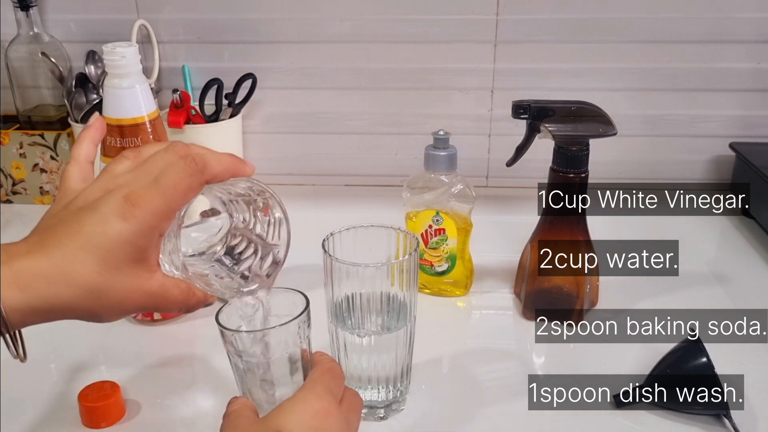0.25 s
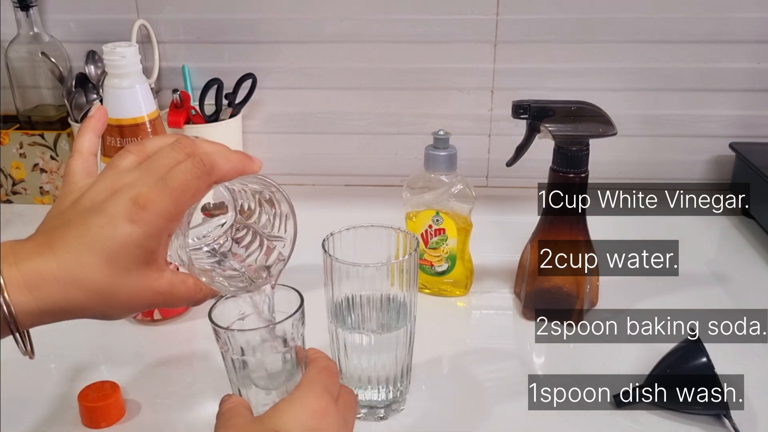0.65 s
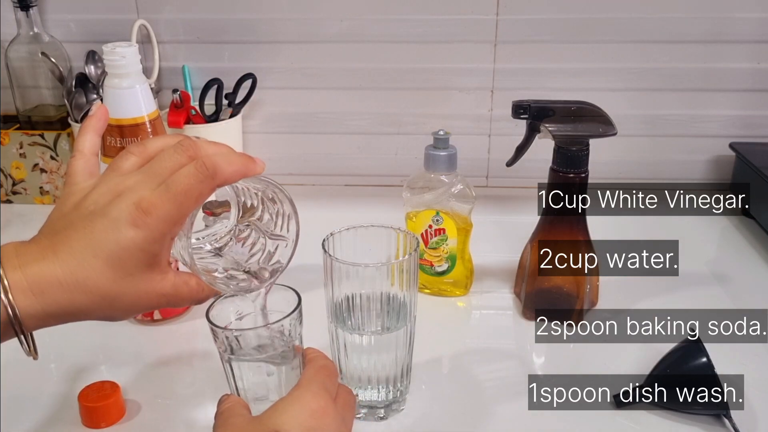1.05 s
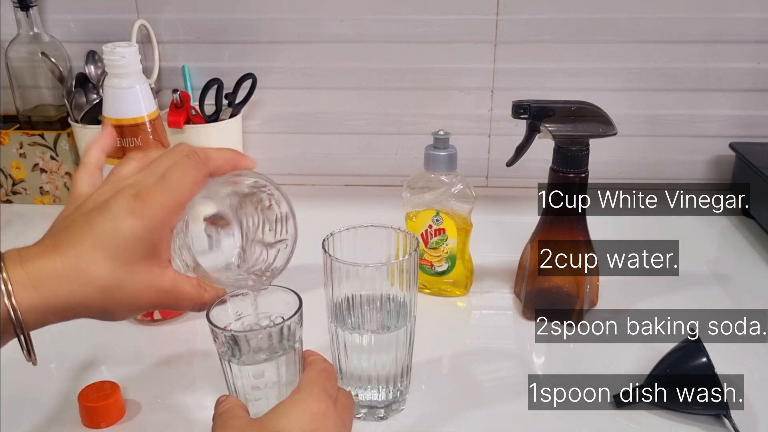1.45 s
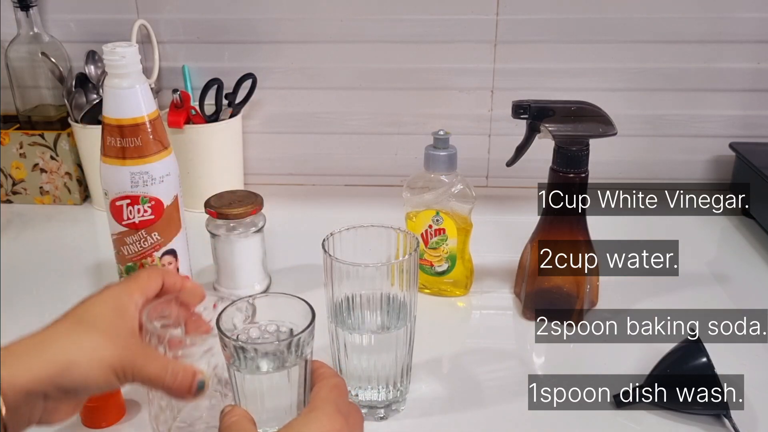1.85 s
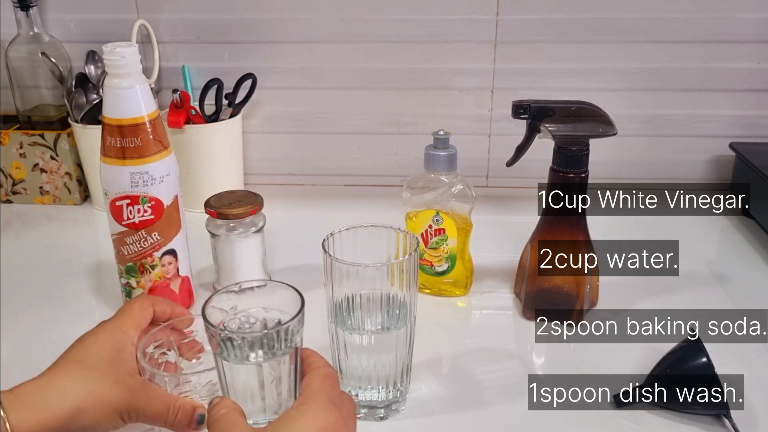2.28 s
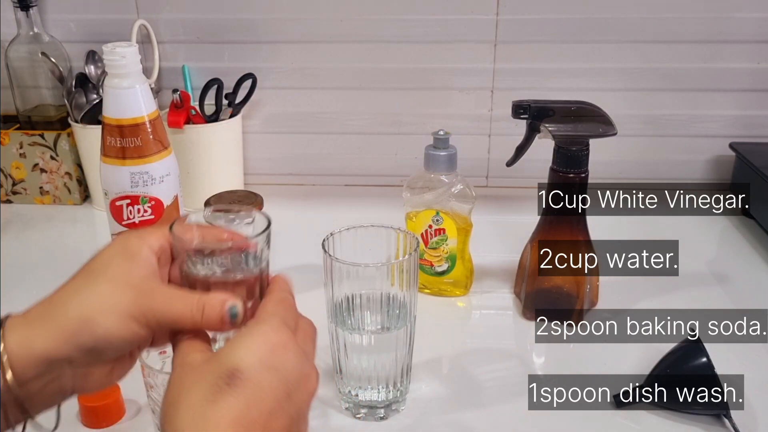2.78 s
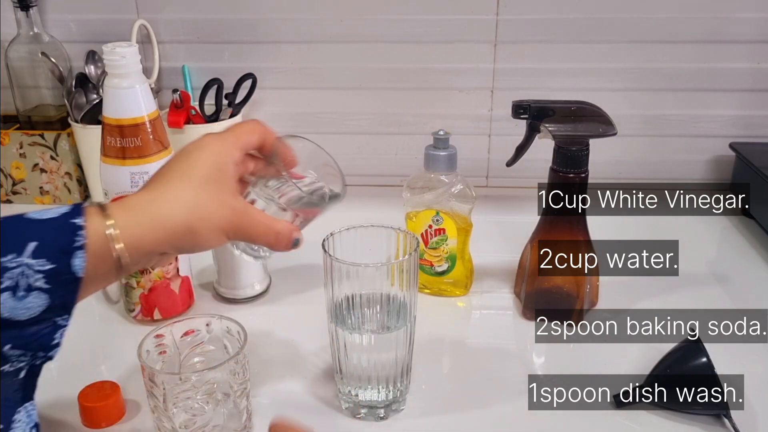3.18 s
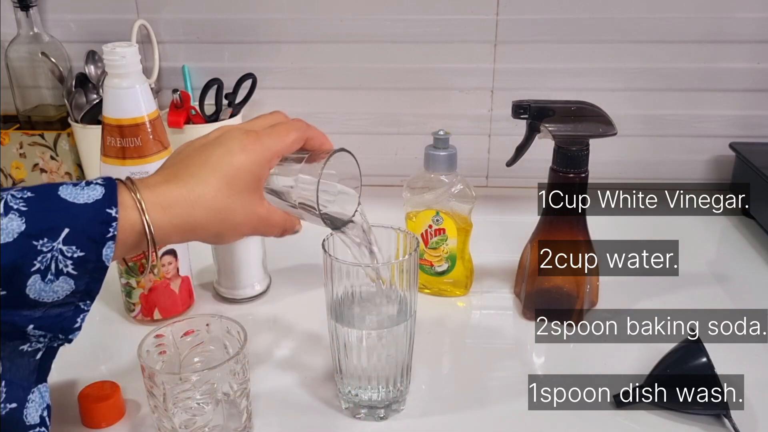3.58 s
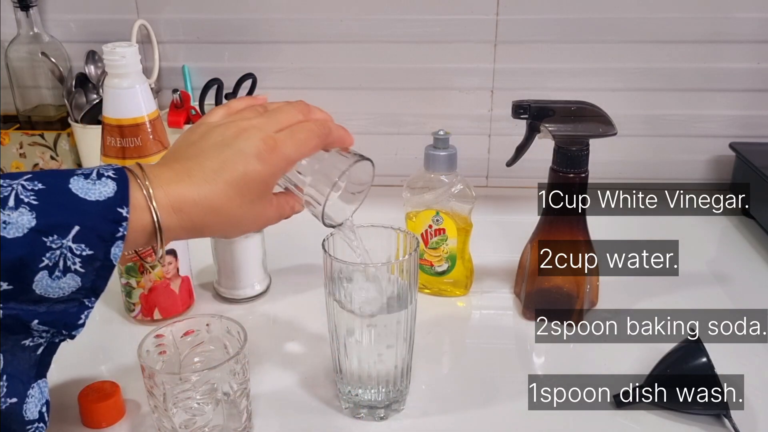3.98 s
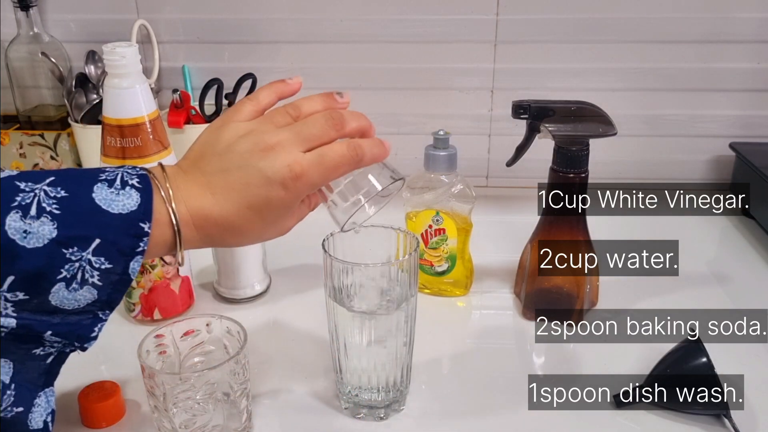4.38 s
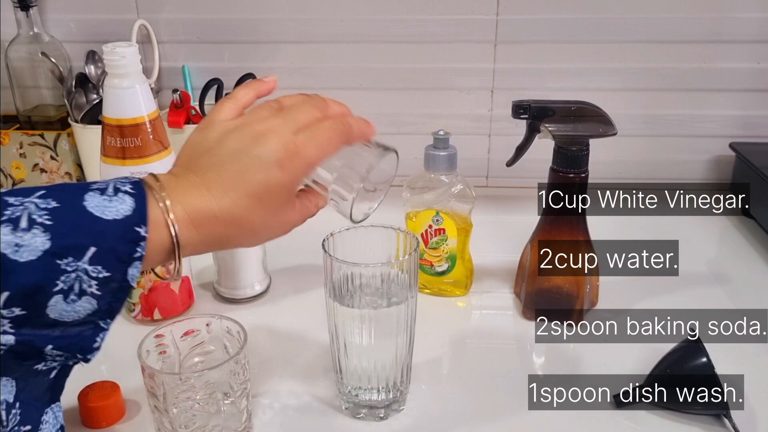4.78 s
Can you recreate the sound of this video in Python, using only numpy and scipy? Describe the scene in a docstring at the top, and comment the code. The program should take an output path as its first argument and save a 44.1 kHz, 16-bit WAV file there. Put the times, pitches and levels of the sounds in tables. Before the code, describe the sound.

Water splashes into a small glass, a tumbler knocks on a stone counter, bangles jingle, and water is poured again in a kitchen.

```python
"""Water splashes and gurgles from a tumbler into a small glass, right of the microphone in a hard-walled
kitchen; the stream drags air under, and the bubbles ring. The tumbler knocks and rocks on the stone
counter. Bangles jingle as the small glass changes hands; it is then emptied into a tall, half-full glass.
A motor hums behind it all, and the microphone stands far enough off to hear plenty of room."""
import sys
import numpy as np
from scipy import signal
from scipy.fft import rfft, irfft
from scipy.io import wavfile
from scipy.ndimage import uniform_filter1d

SR = 44100
rng = np.random.default_rng(int(sys.argv[2]) if len(sys.argv) > 2 else 0)


def pcm_store(signal):
    """Save signal as 16-bit PCM."""
    levels = np.round(np.clip(np.atleast_2d(signal), -1, 1) * 32767)
    wavfile.write(sys.argv[1], SR, levels.astype(np.int16).T)


N = 222374


def from_db(db):
    """Decibels to gain."""
    return 10 ** (np.asarray(db) / 20)


def rms_one(x):
    """Scale to unit power."""
    return x / np.sqrt(np.mean(x ** 2) + 1e-20)


def at_hz(points, hz):
    """Read a table on a log-frequency axis."""
    freqs, values = np.transpose(points)
    return np.interp(np.log(hz), np.log(freqs), values)


def band(x, low, high, order=2):
    """Butterworth band-pass."""
    sos = signal.butter(order, [low, min(high, .48 * SR)], "band", fs=SR, output="sos")
    return signal.sosfilt(sos, x)


def drift(rate_hz):
    """Slow random wander with spread 1."""
    r = np.exp(-80 * np.pi * rate_hz / SR)
    slow = signal.lfilter([1], [1, -2 * r, r * r], rng.standard_normal(N // 40 + 2002))[2000:]
    return np.interp(np.arange(N) / 40, np.arange(len(slow)), rms_one(slow))


def ring(clicks, hz, t60):
    """A unit click sets a sine of height 1 ringing."""
    r, w = np.exp(-np.log(1000) / (t60 * SR)), 2 * np.pi * hz / SR
    return signal.lfilter([0, np.sin(w)], [1, -2 * r * np.cos(w), r * r], clicks + 1e-18)


def fade(t, t60):
    """Free decay, 60 dB down after t60 seconds."""
    return np.exp(-np.log(1000) * t / t60)


def add(out, s, sound):
    """Mix a short sound in at time s."""
    i = round(s * SR)
    out[..., i:i + sound.shape[-1]] += sound[..., :N - i]


def diffuse_bands(size):
    """Half-octave bands of noise from all round the microphone: alike in the bass, unrelated higher up."""
    # likeness of left and right: (frequency [Hz], likeness [0-1])
    likeness = [(30, 0.67), (130, 1), (300, 0.74), (600, 0.13), (1200, 0), (16000, 0)]
    edges = 23 * 2 ** (np.arange(20) / 2)
    white = rng.standard_normal((2, 2, size))
    for k, (low, high) in enumerate(zip(edges, edges[1:])):
        hz = np.sqrt(low * high)
        mid, side = band(white[k % 2], low, high)
        alike = at_hz(likeness, hz)
        yield hz, np.sqrt(1 + alike) * mid + np.sqrt(1 - alike) * side * [[1], [-1]]


def kitchen(build_s=0.00033):
    """Echo of the tiled room: dense reflections that die band by band; unit energy."""
    # echo decay: (frequency [Hz], t60 [s])
    decay = [(100, 0.66), (500, 0.42), (1000, 0.44), (2500, 0.5155), (6000, 0.4037), (15000, 0.35)]
    # echo colour: (frequency [Hz], relative level [dB])
    colour = [(100, 12), (500, 2), (1500, -0.5), (5000, 1.5), (9000, -3.5), (15000, -1.5)]
    t = np.arange(SR // 2) / SR
    tail = sum(noise * from_db(at_hz(colour, hz)) * fade(t, at_hz(decay, hz))
               for hz, noise in diffuse_bands(len(t)))
    return rms_one(tail * (1 - np.exp(-t / build_s))) / np.sqrt(len(t))


def place(x, room, room_db, pan_db, lag_ms=0):
    """Direct sound at the microphone plus echo; positive pan_db is left, lag_ms delays the right side."""
    late = np.interp(np.arange(N) - round(lag_ms * SR / 1000), np.arange(N), x)
    direct = np.array([x, late]) * from_db([[pan_db / 2], [-pan_db / 2]])
    return direct + from_db(room_db) * signal.fftconvolve(x[None], room, axes=1)[:, :N]


def struck(hits, modes, crack, crack_db, crack_t60, vary_db=2):
    """Each contact gives a short crack and rings every mode with a strength of its own."""
    out, t = np.zeros(N), np.arange(SR // 2) / SR
    hz, mode_db, t60 = np.array(modes).T[:, :, None]
    onset = 1 - np.exp(-2 * hz * t)  # a mode takes about one cycle to start radiating
    rings = np.sin(2 * np.pi * hz * t) * fade(t, t60) * onset
    colour = from_db(at_hz(crack, np.fft.rfftfreq(len(t), 1 / SR) + 1))
    for s, db in hits:
        noise = irfft(colour * rfft(rng.standard_normal(len(t))), len(t))
        burst = rms_one(noise) * fade(t, crack_t60)
        strengths = from_db(mode_db - vary_db * rng.standard_normal(hz.shape))
        add(out, s, from_db(db) * ((strengths * rings).sum(0) + from_db(crack_db) * burst))
    return out


def room_air():
    """Room tone: a steady, low rush of air from all round."""
    # air spectrum: (frequency [Hz], relative density [dB])
    colour = [(25, -10), (45, -12), (90, 3.5), (160, -11.5), (260, -2), (380, -8), (520, -14), (1000, -22),
              (2000, -25), (3800, -28), (5200, -37.5), (8000, -29), (10200, -48), (13000, -36.5),
              (16000, -36)]
    return rms_one(sum(from_db(at_hz(colour, hz)) * noise for hz, noise in diffuse_bands(N)))


def motor_hum(waver_hz=6, lead_s=0.00013):
    """A motor's wavering tones reach the right side of the microphone first."""
    # motor tones: (frequency [Hz], level [dB], waver [0-1])
    tones = [(118.9, -71, 0.5), (148.4, -50.5, 0.12), (195.7, -55, 0.16), (322.4, -57.5, 0.2)]
    t = np.arange(N) / SR + np.array([[0], [lead_s]])
    hum = 0
    for hz, db, waver in tones:
        swing = 1 + waver * (drift(waver_hz) + 1j * drift(waver_hz))
        tone = swing * np.exp(2j * np.pi * (hz * t + rng.random()))
        hum += from_db(db) * rms_one(tone.real)
    return hum


def hiss(pan_db=4.5):
    """Soft hisses swell a little to the left as the small glass is upended and lifted away."""
    # swells: (peak time [s], half-length [s], level [dB], tilt above 3 kHz [dB/octave])
    swells = [(4.5, 0.23, -57.5, 0), (5.04, 0.029, -54, -11)]
    # hiss spectrum: (frequency [Hz], relative density [dB])
    colour = [(600, 7), (1200, 2.5), (2000, -3), (4500, -5), (7000, -2.5), (9500, -4.5), (12500, -3),
              (15500, -3)]
    out, t = 0, np.arange(N) / SR
    bands = [(hz, part) for hz, part in diffuse_bands(N) if hz > colour[0][0]]
    for s, half_s, db, tilt in swells:
        noise = sum(from_db(at_hz(colour, hz) + tilt * np.log2(max(hz / 3000, 1))) * part
                    for hz, part in bands)
        out += from_db(db) * np.exp(-((t - s) / half_s) ** 2) * rms_one(noise)
    return out * from_db([[pan_db / 2], [-pan_db / 2]])


def bangles(room, gap_s=.004, loss_db=2, count=4):
    """Loose bangles chatter near the centre: every touch is a few uneven, weakening contacts."""
    # touches: (time [s], level [dB])
    touches = [(1.289, -59), (1.620, -56), (2.508, -58), (2.524, -38), (2.551, -52), (2.865, -45.5)]
    # bangle modes: (frequency [Hz], relative level [dB], t60 [s])
    modes = [(5180, -19, 0.051), (5540, -22, 0.047), (8150, -21, 0.039), (8180, -4.5, 0.015),
             (7960, -18, 0.015), (8560, -3, 0.02), (12000, -4.5, 0.021), (13040, -3, 0.039),
             (13040, -9.5, 0.014), (14150, -21, .04), (15050, -16, 0.031)]
    # bangle on bangle: (frequency [Hz], relative density [dB])
    crack = [(1000, -40), (3000, -2.5), (5300, -9), (6500, -8), (8400, -18), (10200, -18), (13000, 9),
             (15500, -7)]
    uneven = rng.random((len(touches), count)) - .5
    chatter = [(s + gap_s * (k + jitter * (k > 0)), db - loss_db * k)
               for (s, db), row in zip(touches, uneven) for k, jitter in enumerate(row)]
    jingle = struck(chatter, modes, crack, crack_db=-1, crack_t60=0.0086)
    return place(jingle, room, room_db=2, pan_db=-1, lag_ms=.2)


def clinks(room):
    """Off to the right, rim meets rim; later the filled glass rings lightly as it is nudged."""
    # rim touches and nudges: (time [s], level [dB])
    touches = [(0.6635, -43), (0.6655, -34.5), (0.6835, -51)]
    nudges = [(1.381, -54.5), (1.412, -58)]
    # modes of the rims and the filled glass: (frequency [Hz], relative level [dB], t60 [s])
    rim_modes = [(2123, 3, 0.039), (3126, -5, 0.064), (5020, 2, 0.027), (7100, -6, 0.044),
                 (8950, -12, 0.044), (9750, -22, 0.036)]
    full_modes = [(870, -3, 0.041), (2420, -8, .15), (2942, -4.5, 0.18), (5400, -2, 0.033)]
    # contact on glass: (frequency [Hz], relative density [dB])
    crack = [(60, -28), (300, -35), (1000, -14), (2200, 5), (3300, 0.5), (6000, -9), (9500, 1.5),
             (11000, -13), (15500, -13)]
    rim = struck(touches, rim_modes, crack, crack_db=2.5, crack_t60=0.019)
    nudge = struck(nudges, full_modes, crack, crack_db=-13, crack_t60=0.018)
    return place(rim + nudge, room, room_db=2.5, pan_db=-7, lag_ms=.05)


def tumbler(room, split_hz=1450):
    """The tumbler lands and rocks; its low knock comes from the left, its bright ring from all round."""
    # contacts of the foot: (time [s], level [dB])
    landings = [(2.1827, -20), (2.1905, -28.5), (2.2003, -26.5), (2.216, -25.5), (2.2325, -33)]
    # modes of the tumbler on the counter: (frequency [Hz], relative level [dB], t60 [s])
    modes = [(119, -20.5, 0.15), (220, -25.5, 0.28), (327, -15.5, 0.061), (958, -8.5, 0.14),
             (1050, 0.5, 0.084), (1080, 3.5, 0.02), (1367, -11, 0.088), (1920, -11, 0.031),
             (2100, -9, 0.029), (2273, 3, 0.033), (2326, -8, 0.26), (2580, -28, 0.019), (2730, -21, 0.042),
             (3470, -9.5, 0.045), (4760, 2, 0.0075), (5170, -9, 0.01), (4980, -24, 0.038)]
    # glass on stone: (frequency [Hz], relative density [dB])
    crack = [(30, -54), (130, -16), (350, -1.5), (780, -9), (1200, 8.5), (1700, 3.5), (2450, 6.5),
             (3100, -2), (5700, -1), (7000, -23), (10000, -12.5), (15500, -33)]
    landing = struck(landings, modes, crack, crack_db=0, crack_t60=0.039)
    knock = from_db(-1) * band(landing, 90, split_hz, order=3)
    bright = from_db(1) * band(landing, split_hz, SR / 2, order=3)
    return (place(knock, room, room_db=-3, pan_db=8.5, lag_ms=.12)
            + place(bright, room, room_db=-3, pan_db=-1, lag_ms=.05))


def ticks(room, width=1.7, t60_1khz=0.015, damping=0.69):
    """Sharp, almost pitchless ticks and splats, well to the left; the brighter, the shorter."""
    # snaps: (time [s], attack level [dB], centre [Hz])
    snaps = [(0.1252, -35, 13000), (0.4973, -37, 7100), (0.664, -35.5, 650), (0.7045, -37.5, 9000),
             (1.4756, -49.5, 655), (1.497, -50, 630), (4.1629, -42.5, 656), (4.163, -37, 3520),
             (4.56, -47.5, 3760), (4.941, -28.5, 14700), (4.9662, -44, 2700)]
    out, t = np.zeros(N), np.arange(SR // 20) / SR
    for s, db, hz in snaps:
        decay = fade(t, t60_1khz * (hz / 1000) ** -damping)
        snap = band(rng.standard_normal(len(t)) * decay, hz / width, hz * width)
        add(out, s, from_db(db) * snap * np.linalg.norm(decay) / np.linalg.norm(snap))
    return place(out, room, room_db=0.5, pan_db=13)


def first_slap(room):
    """The stream hits the empty glass, right of the microphone, and sets it ringing."""
    # slap: (time [s], level [dB])
    hits = [(0.2095, -28)]
    # modes of the empty glass: (frequency [Hz], relative level [dB], t60 [s])
    modes = [(5390, 1, 0.026), (5670, -1, 0.023), (10250, -11, 0.097), (12800, -13, .02), (15300, -10, .02)]
    # water on glass: (frequency [Hz], relative density [dB])
    crack = [(1000, -41), (2500, -13), (4500, -6), (5400, -8), (6400, 2), (7500, -9), (10000, -4),
             (12000, -8), (15500, -1)]
    slap = struck(hits, modes, crack, crack_db=-1, crack_t60=0.034)
    return place(slap, room, room_db=-5.5, pan_db=-7.5)


def bubbles(room, t60_1khz=0.054, damping=0.64, rise=0.049, pinch_s=0.00078, shed_s=.022, shed_db=-11):
    """A pinched-off bubble rings, longer if it is large, and climbs in pitch as it nears the surface."""
    # the loudest single bubbles: (time [s], relative level [dB], pitch [Hz])
    plops = [(0.127, -31, 3510), (0.322, -36.5, 1386), (0.349, -30.5, 683), (0.353, -32.5, 946),
             (0.351, -33.5, 1490), (0.402, -35, 1606), (0.417, -35, 952), (0.441, -31.5, 944),
             (0.444, -36, 1380), (0.468, -34.5, 1484), (0.527, -32.5, 1545), (0.547, -38.5, 1456),
             (0.548, -36.5, 2040), (0.704, -33.5, 1645), (0.726, -38, 2170), (0.747, -33, 1756),
             (0.879, -39.5, 4330), (0.895, -43, 1780), (3.433, -34, 456), (3.47, -32.5, 8600),
             (3.479, -33, 3400), (3.528, -30, 1180), (3.557, -38.5, 4530), (3.704, -45, 1430),
             (3.74, -42, 4550), (3.834, -47.5, 1685), (3.846, -43.5, 6560), (3.986, -41, 1660),
             (3.992, -39, 4840), (4.037, -40.5, 1900), (4.061, -44, 1520), (4.088, -35, 6070)]
    out, t = np.zeros(N), np.arange(SR // 8) / SR
    onset = 1 - np.exp(-t / pinch_s)
    for s, db, hz in plops:
        t60 = t60_1khz * (hz / 1000) ** -damping
        glide = 1 + rise * np.minimum(t / t60, 1)
        # each sheds three weaker bubbles of like size
        shed = [(s + shed_s * when, db + shed_db, hz * np.exp(0.223 * (2 * size - 1)))
                for when, size in rng.random((3, 2))]
        for start, level_db, pitch in [(s, db, hz)] + shed:
            phase = 2 * np.pi * np.cumsum(pitch * glide) / SR
            add(out, start, from_db(level_db) * np.sin(phase) * fade(t, t60) * onset)
    return place(from_db(-1.5) * out, room, room_db=-3.5, pan_db=3.5)


def swarm(spectrum, per_s, cycles, spread_db, climb, count=28):
    """Many small, random bubbles at an even level; climb(time) shifts their spectrum by a factor."""
    born = np.flatnonzero(rng.random(N) < per_s / SR)
    size, sign, pitch = rng.random((3, N))[:, born]
    heights = from_db(spread_db * np.minimum(-np.log(size), 4)) * np.sign(sign - .5)
    pitch_index = (pitch * count).astype(int)
    out = np.zeros(N)
    for k, hz in enumerate(np.geomspace(spectrum[0][0], spectrum[-1][0], count)):
        clicks = np.zeros(N)
        clicks[born] = heights * (pitch_index == k) * from_db(at_hz(spectrum, hz / climb(born / SR)))
        out += hz * ring(clicks, hz, cycles / hz)
    return out / np.sqrt(uniform_filter1d(out ** 2, SR // 12) + 1e-9)


def pour(flow, gurgle_colour, spray_colour, octaves_per_s, spray_per_s, spray_cycles):
    """The stream drags air under (gurgle, rising as the glass fills) and throws drops and fizz (spray)."""
    s, gurgle_db, spray_db = np.transpose(flow)
    t = np.arange(N) / SR
    gurgle = swarm(gurgle_colour, per_s=500, cycles=32, spread_db=-3.5,
                   climb=lambda at: 2 ** (octaves_per_s * (at - s[0])))
    spray = swarm(spray_colour, spray_per_s, spray_cycles, spread_db=2.5, climb=np.ones_like, count=48)
    gurgle *= from_db(np.interp(t, s, gurgle_db))
    spray *= from_db(np.interp(t, s, spray_db))
    return (gurgle + spray) * (t > s[0]) * (t < s[-1])


def water(room):
    """Two pours, right of the microphone: into the empty glass, then into the tall one's deep water."""
    # course of each pour: (time [s], relative gurgle level [dB], relative spray level [dB])
    flow_empty = [(0.12, -77, -49.5), (0.23, -75, -45), (0.295, -54.5, -60), (0.345, -46, -42.5),
                  (0.47, -55, -60.5), (0.65, -64, -61), (0.76, -63, -55), (0.97, -87, -70.5),
                  (1.5, -79, -67.5)]
    flow_deep = [(3.43, -49, -51), (3.53, -55, -53), (3.66, -71, -66), (3.79, -59, -61.5), (3.96, -82, -70),
                 (3.995, -54.5, -56), (4.09, -51.5, -54), (4.15, -89, -64), (4.28, -72, -74)]
    # gurgle as each pour begins: (frequency [Hz], relative level [dB])
    gurgle_empty = [(520, 7.5), (780, 7.5), (930, -12), (1180, 9), (1600, -4), (2100, 1.5), (2900, -7)]
    gurgle_deep = [(500, 7), (800, -3), (1120, 18), (1600, 2.5), (2700, -19)]
    # spray of each pour: (frequency [Hz], relative level [dB])
    spray_empty = [(2300, -3.5), (3600, 1), (5500, -0.5), (8000, 2), (11000, -9.5), (15500, -2.5)]
    spray_deep = [(2300, -5), (3500, -2), (4100, -19), (4800, 3.5), (5500, -9), (6300, -0.5), (8000, -0.5),
                  (11000, -9.5), (15500, -5)]
    first = pour(flow_empty, gurgle_empty, spray_empty,
                 octaves_per_s=0.88, spray_per_s=4600, spray_cycles=100)
    second = pour(flow_deep, gurgle_deep, spray_deep,
                  octaves_per_s=0.72, spray_per_s=4500, spray_cycles=170)
    # the glass walls shield the water: much of it arrives by way of the room
    return place(from_db(-5.5) * (first + second), room, room_db=2, pan_db=-6.5)


def scene():
    """Water, glass and bangles share one kitchen, heard from one spot."""
    room = kitchen()
    background = (motor_hum() + from_db(-50) * room_air()) * from_db([[0.64], [-0.64]])
    pouring = water(room) + bubbles(room) + first_slap(room)
    handling = clinks(room) + bangles(room) + ticks(room) + tumbler(room) + hiss()
    return background + handling + pouring


def record(dry):
    """The top is cut steeply above 16 kHz."""
    return signal.sosfilt(signal.ellip(10, .1, 80, 16000, fs=SR, output="sos"), dry)


dry = scene()
out = record(dry)
pcm_store(out)
```